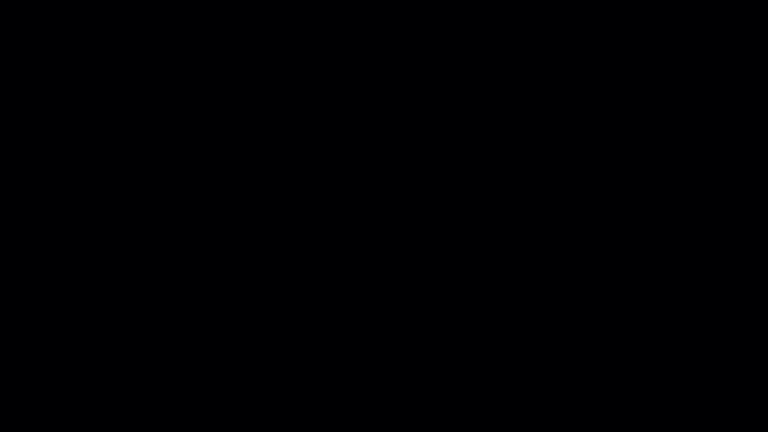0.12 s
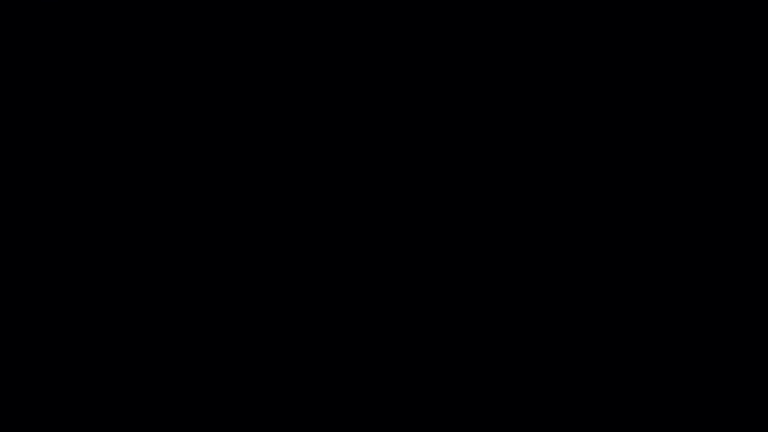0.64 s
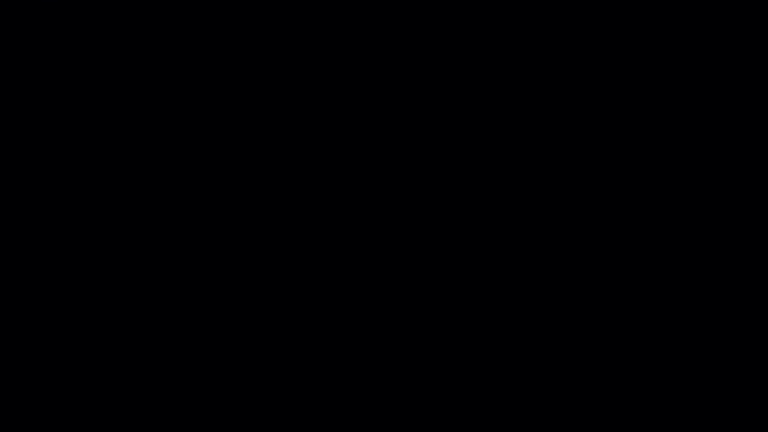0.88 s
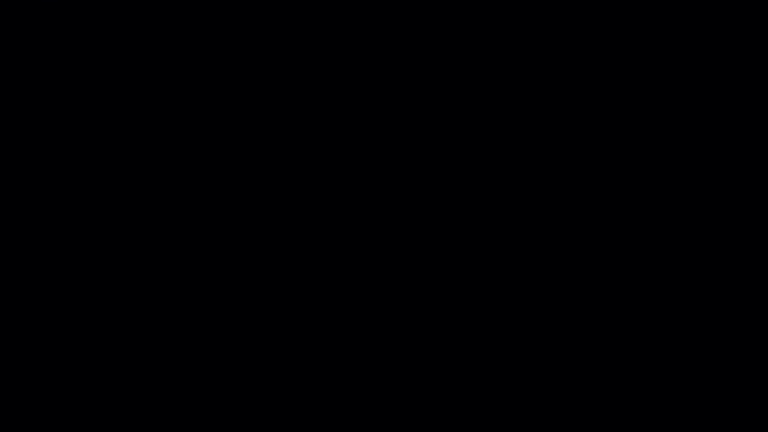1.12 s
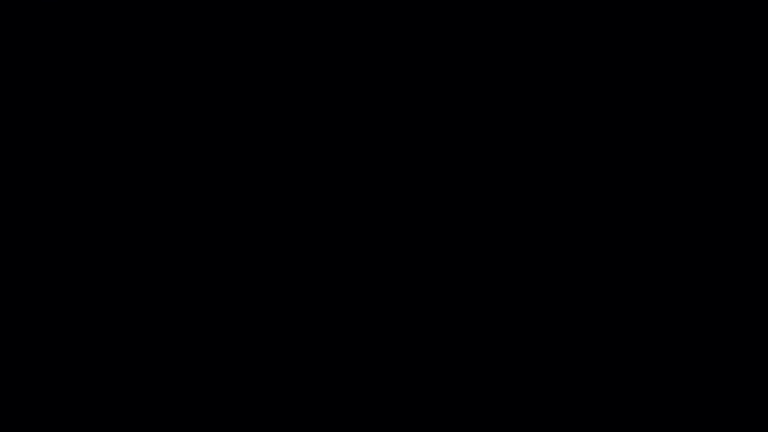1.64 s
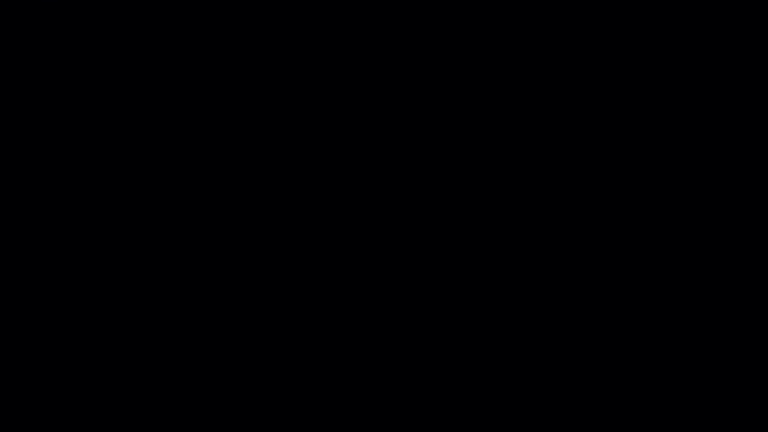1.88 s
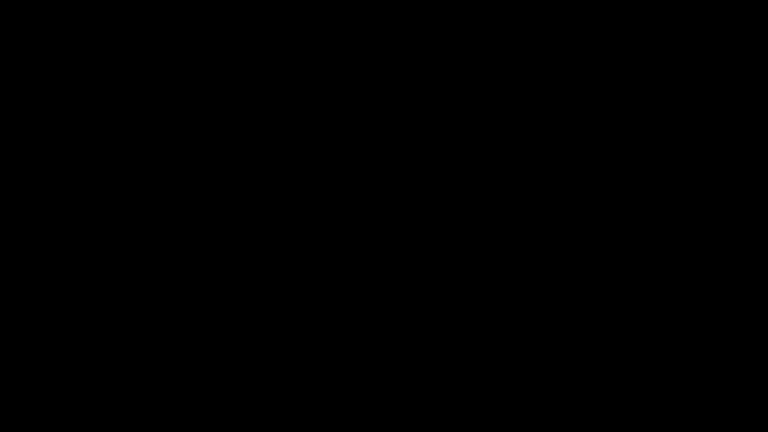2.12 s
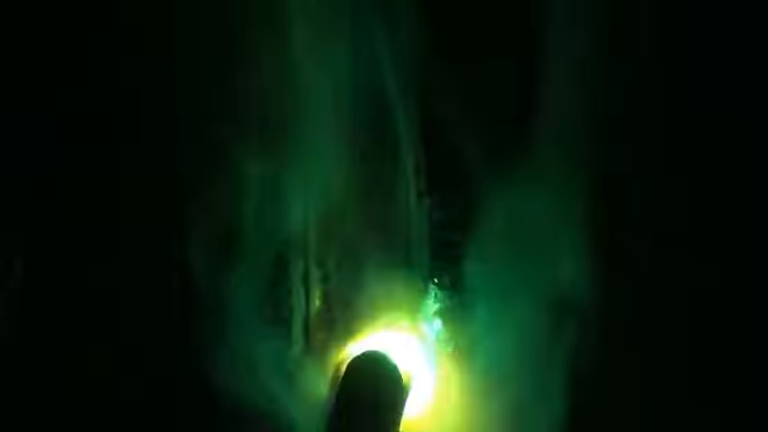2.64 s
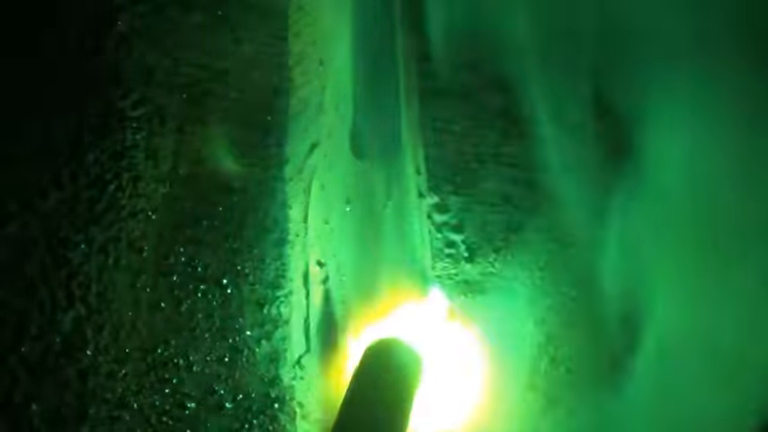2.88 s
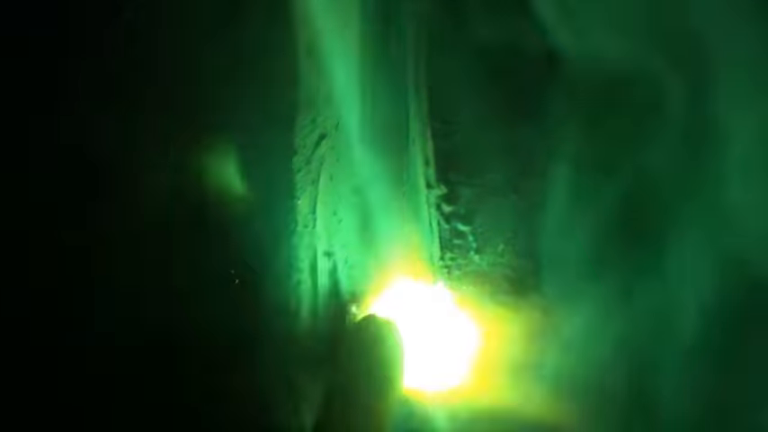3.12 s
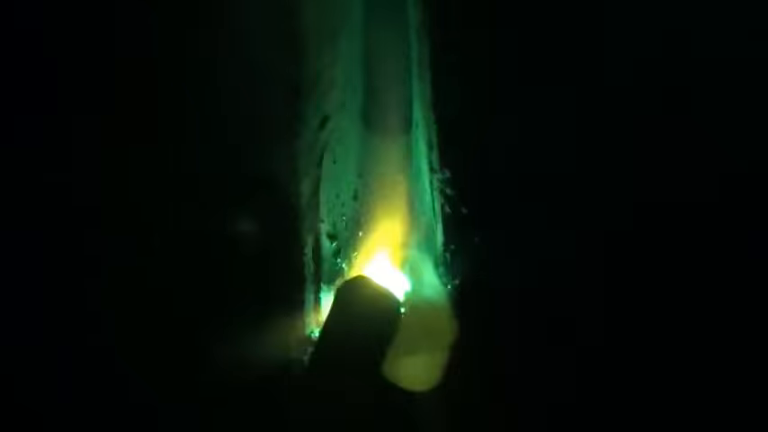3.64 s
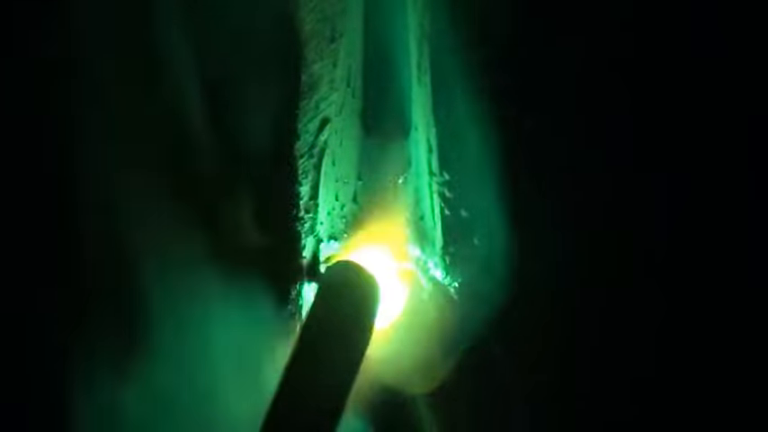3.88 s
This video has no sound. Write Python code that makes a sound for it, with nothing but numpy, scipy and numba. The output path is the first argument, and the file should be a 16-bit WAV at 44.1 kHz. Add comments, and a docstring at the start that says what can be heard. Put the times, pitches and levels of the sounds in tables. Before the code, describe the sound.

Stick welding arc bursts into roaring sizzle and pops after a humming fan, taps and sparks

```python
"""A five-blade fan hums in a stick welder's machine: sines on the orders of its shaft, over rushing air.
The rod taps, scratches and sparks on steel: decaying modes and short bursts of coloured noise.
A brief flash dies away; later the arc strikes, a roar and sizzle of tiny discharges with droplet pops
and the inverter's whine. The recorder's look-ahead limiter ducks everything under each loud spark."""
import sys
import numpy as np
from scipy import signal
from scipy.fft import rfft, irfft, next_fast_len
from scipy.io import wavfile
from scipy.ndimage import uniform_filter1d, minimum_filter1d, map_coordinates
from numba import njit

SR = 44100
rng = np.random.default_rng(int(sys.argv[2]) if len(sys.argv) > 2 else 0)


def digitize_waveform(pressure):
    """Quantize a signal to 16-bit integers and store it at the path in sys.argv[1].

    Rows of a 2-D input are taken as channels; values are limited to [-1, 1].
    """
    field = np.atleast_2d(pressure).T
    bounded = np.clip(field, -1, 1)
    quanta = np.round(bounded * 32767).astype(np.int16)
    wavfile.write(sys.argv[1], SR, quanta)


def elevation(decibels):
    """Turn decibel levels (scalar or array-like) into linear amplitude ratios."""
    levels = np.asarray(decibels, float)
    return 10 ** (levels / 20)


N = 176400

# Likeness of the two channels asked of arc and sparks.
# Each row: frequency in Hz, squared left-right correlation from 0 to 1.
ARC_COHERENCE = [(600, 0.63), (1410, 0.63), (2400, 0.98), (4500, 0.4), (6820, 0.81), (9500, 0.73),
                 (12000, 1)]
# Stereo balance of arc and sparks. Each row: frequency in Hz, left over right in dB.
ARC_BALANCE = [(700, -4), (2400, 1.5), (6800, 0.5), (15000, -1)]


def unit(x):
    """Normalisation by the root mean square: the result has rms 1."""
    return x / np.sqrt(np.mean(x ** 2) + 1e-20)


def along(points, hz):
    """Interpolation of (Hz, value) points on a logarithmic frequency axis."""
    point_hz, values = np.transpose(points)
    return np.interp(np.log(hz + 1), np.log(point_hz + 1), values)


def curves(rows):
    """Piecewise-linear envelopes: one value per sample for each column after the time."""
    seconds, *columns = np.transpose(rows)
    return [np.interp(np.arange(N) / SR, seconds, column) for column in columns]


def wobble(rate):
    """Band-limited random modulation: a smooth curve through `rate` random knots a second."""
    knots = rng.standard_normal(int(N * rate / SR) + 4)
    return map_coordinates(knots, [np.arange(N) * rate / SR])


def coloured(pair, spectrum, coherence, balance, peaks=()):
    """Minimum-phase filtering of a mid and a side signal, mixed to stereo by coherence and balance."""
    m = next_fast_len(N + 8192)
    hz = np.fft.rfftfreq(m, 1 / SR)
    floored_db = np.maximum(along(spectrum, hz), -70)
    peaks_db = sum(up / (1 + (2 * (hz - f) / width) ** 2) for f, width, up in peaks)
    # folding the cepstrum onto positive times makes the filter causal
    cepstrum = irfft(np.log(elevation(floored_db + peaks_db)), m)
    cepstrum[1:m // 2] *= 2
    cepstrum[m // 2 + 1:] = 0
    response = np.exp(rfft(cepstrum))
    angle = np.arccos(np.sqrt(np.clip(along(coherence, hz), 0, 1))) / 2
    mid, side = rfft(pair, m) * response * [np.cos(angle), np.sin(angle)]
    lean = elevation(along(balance, hz) / 2)
    return irfft([(mid + side) * lean, (mid - side) / lean], m)[:, :N]


def discharge(spectrum, per_s, spread_db, crackle, flutter_db):
    """Shot noise: random micro-discharges of uneven size mixed with plasma hiss, at rms 1."""
    # Resonances of the room, helmet and microphone housing.
    # Each row: frequency in Hz, width in Hz at half the dB height, height in dB.
    resonances = [(2260, 130, 5.5), (2687, 32, 11), (2947, 210, 5.5), (3320, 60, -1.5), (3570, 29, 9.5),
                  (6660, 38, 9), (7080, 65, 7.5), (7900, 50, 7.5), (8200, 71, 3), (8500, 100, 8)]
    struck = rng.random(N) < per_s / SR
    sign = np.sign(rng.standard_normal(N))
    clicks = struck * sign * elevation(spread_db * rng.random(N))
    share = np.clip(crackle, 0, 1)
    hiss = rng.standard_normal((2, N))
    pair = np.sqrt(1 - share) * hiss + np.sqrt(share) * np.array([unit(clicks), hiss[1]])
    flutter = elevation(flutter_db * (0.37 * wobble(25.02) + wobble(110)))
    return unit(flutter * coloured(pair, spectrum, ARC_COHERENCE, ARC_BALANCE, resonances))


def arc():
    """Plasma noise in two bands and an inverter ripple tone, each under its own envelope, after a flash."""
    # The burning arc. Each row: time in seconds, roar level in dB, sizzle level in dB.
    arc_levels = [(2.266, -56, -60), (2.272, -22, -14), (2.3, -24.5, -15), (2.34, -15, -12),
                  (2.4, -13, -18.5), (2.43, -12, -14), (2.52, -14.5, -11), (2.57, -18, -17),
                  (2.66, -17.5, -14), (2.74, -16, -16), (2.77, -24, -24), (2.8, -23.5, -20.5),
                  (2.86, -20, -23), (2.99, -14.5, -18), (3.1, -21.5, -22.5), (3.15, -15.5, -18.5),
                  (3.22, -16, -17.5), (3.28, -18.5, -13.5), (3.35, -19, -17), (3.46, -20, -15),
                  (3.53, -20.5, -14), (3.6, -16.5, -14.5), (3.68, -21.5, -17.5), (3.73, -25.5, -14.5),
                  (3.78, -20.5, -12), (3.81, -22, -15.5), (3.9, -22, -16), (4, -21, -18.5)]
    # Spectrum of the roar. Each row: frequency in Hz, relative power density in dB.
    roar_spectrum = [(350, -35.5), (600, -27.5), (846, -4.5), (1020, -19.5), (1050, -7), (1140, -7),
                     (2180, -2), (2550, -6), (3020, -1.5), (3720, 0.5), (4260, -13), (5200, -13.5),
                     (6760, -62), (11400, -120)]
    # Spectrum of the sizzle. Each row: frequency in Hz, relative power density in dB.
    sizzle_spectrum = [(2350, -50.5), (4000, -2.5), (4280, -10.5), (5150, -10), (5700, -4), (7500, -3),
                       (8300, 0.5), (8700, -4.5), (9180, -7), (12000, -10), (12900, -5.5), (13800, -16),
                       (14900, -13), (15400, -5)]
    # The inverter's ripple, heard through the arc. Each row: time in seconds, mean rms level in dB.
    whine_levels = [(2.295, -60), (2.315, -27), (2.39, -15), (2.45, -27), (2.53, -30), (2.62, -17.5),
                    (2.75, -18), (2.772, -50), (2.79, -16), (2.9, -26), (2.99, -15), (3.09, -24),
                    (3.145, -30), (3.23, -21), (3.27, -26), (3.32, -17), (3.4, -26), (3.46, -26),
                    (3.55, -27), (3.6, -20), (3.68, -28), (3.72, -16), (3.765, -25), (3.785, -0.5),
                    (3.81, -15), (3.9, -19), (4, -18.5)]
    # The first flash of arc, which dies. One row: start in seconds, starting level in dB, T60 in seconds.
    first_flash = (.4825, -15, .38)
    # Spectrum of the flash. Each row: frequency in Hz, relative power density in dB.
    flash_spectrum = [(590, -66), (1000, -32), (1150, 4), (1280, -20), (1590, -17), (3080, -4),
                      (4680, -13.5), (7880, -2), (9490, -6), (15100, -11.5), (16000, -30)]
    whine_hz = 15691

    t = np.arange(N) / SR
    start_s, flash_db, t60 = first_flash
    flash_gain = (t > start_s) * elevation(flash_db - 60 * np.abs(t - start_s) / t60)
    flash = flash_gain * discharge(flash_spectrum, per_s=450, spread_db=11, crackle=.15, flutter_db=-3.5)

    roar_db, sizzle_db = curves(arc_levels)
    roar = elevation(roar_db) * discharge(roar_spectrum, per_s=400, spread_db=11.5, crackle=0.5, flutter_db=1.25)
    sizzle = elevation(sizzle_db) * discharge(sizzle_spectrum, per_s=1800, spread_db=12.5, crackle=0.53,
                                        flutter_db=0.35)

    whine_gain = np.sqrt(2) * elevation(curves(whine_levels)[0] + 1.4 * wobble(30))
    whine = whine_gain * np.sin(2 * np.pi * whine_hz * t + 0.54 * wobble(40))
    burning = t > arc_levels[0][0]
    return flash + burning * (roar + sizzle + whine)


def sparks():
    """Impulse excitation: a sharp crack and brief fizz per spark or pop, gritty noise per drag of the rod."""
    # Sparks as the rod scratches. Each row: time in seconds, relative level in dB.
    scratch_sparks = [(0.0224, -29), (0.0452, -19), (0.0819, -30), (0.756, -30), (1.3004, -15),
                      (1.3853, -10), (1.5979, -7), (1.6028, -13), (1.6074, -14), (1.6142, -20),
                      (1.7762, -25), (1.8222, -28), (1.9133, -26), (1.922, -29), (1.9275, -14),
                      (1.9361, -2), (1.9434, -17), (1.9479, -21), (1.9534, -12), (1.9876, -14),
                      (1.9929, -22), (2.0066, -17), (2.0135, -12), (2.0197, -24), (2.0301, -20),
                      (2.0438, -27), (2.0907, -27), (2.0965, -29), (2.1068, -19), (2.1135, -26),
                      (2.1249, -20), (2.1764, -28), (2.1846, -11), (2.1961, -25), (2.2031, -27),
                      (2.2298, -28), (2.2411, -15), (2.2512, -29), (2.2694, -6), (2.2768, -6),
                      (2.2827, -10), (2.2924, -1), (1.5945, -10), (.4832, -3), (.4905, -9), (.9706, -17)]
    # Droplets short the arc and pop. Each row: time in seconds, relative level in dB.
    droplet_pops = [(2.4374, -7), (2.5016, -6), (2.5864, -8), (2.6977, -9), (2.775, -3.5), (2.942, -8.5),
                    (3.0066, -12), (3.1914, -3), (3.2177, -6), (3.2417, -8), (3.3112, 5), (3.4426, -2),
                    (3.4979, -0.5), (3.5564, 7), (3.6903, 19.5), (3.7722, 1), (3.789, -4), (3.8494, -8)]
    # The rod drags. Each row: start in seconds, length in seconds, relative level in dB.
    scrapes = [(1.589, 0.033, -30), (1.92, 0.051, -25), (1.986, 0.043, -23.5), (2.088, 0.04, -29.5),
               (2.159, 0.14, -37)]
    # Colour of crack, fizz and scrape. Each row: frequency in Hz, relative level in dB.
    spark_spectrum = [(40, -13), (500, 9), (1500, -9), (2910, 1), (5300, -11.5), (6830, -2.5), (9010, 0.5),
                      (11400, -7), (12600, -12.5), (14300, -18.5), (16000, -9)]
    fizz_t60_s, fizz_db = .011, -7  # fizz level against its crack
    spark_db, grit_db = 3, 4.5  # added to all sparks and pops; unevenness of a scrape

    out = np.zeros((2, N + SR))
    t = np.arange(1500) / SR
    for start_s, db in scratch_sparks + droplet_pops:
        burst = elevation(fizz_db - 60 * t / fizz_t60_s) * rng.standard_normal((2, len(t)))
        burst[0, 0] = 2  # the crack, in the mid signal
        out[:, round(start_s * SR) - 6:][:, :len(t)] += elevation(db + spark_db) * burst
    for start_s, length_s, db in scrapes:
        n = round(length_s * SR)
        envelope = elevation(db + grit_db * wobble(235)[:n]) * np.hanning(n) ** 0.76
        out[:, round(start_s * SR):][:, :n] += envelope * rng.standard_normal((2, n))
    # white noise through the same colour sets the scale
    noise = coloured(rng.standard_normal((2, N)), spark_spectrum, ARC_COHERENCE, ARC_BALANCE)
    return coloured(out[:, :N], spark_spectrum, ARC_COHERENCE, ARC_BALANCE) / np.std(noise)


def taps():
    """Modal synthesis: rod and plate ring in decaying modes, with filtered noise for knock and rattle."""
    # Touches of rod on plate. Each row: start in seconds, rise time constant in seconds,
    # then relative levels of rod, plate and knock in dB.
    touches = [(.4828, .0005, -40, -45, 1), (.821, .006, -35, -27, -26), (.8715, .002, -42, -38, -30),
               (.9695, .0005, -26, -45, -12), (1.299, .0005, -55, -55, -19), (1.7615, .0005, -55, -55, -15)]
    # Modes of the rod. Each row: frequency in Hz, relative level in dB, T60 in seconds.
    rod_modes = [(696, 5.5, 0.038), (3110, 1, .1), (3440, 5, 0.057), (10400, -3, 0.28), (11600, -4, .06)]
    # Modes of the plate. Each row: frequency in Hz, relative level in dB, T60 in seconds.
    plate_modes = [(2945, -3, .12), (5868, 2, .065), (8172, -8, .07), (14640, -8, .04)]
    out = np.zeros(N + SR)
    t = np.arange(SR // 2) / SR

    def ring(modes):
        """Free vibration: a sum of exponentially decaying sines with slightly unsteady phase."""
        return sum(elevation(db - 60 * t / t60) * np.sin(2 * np.pi * hz * t + .5 * wobble(300)[:len(t)])
                   for hz, db, t60 in modes)

    def noise_burst(band_hz, t60):
        """Damped broadband excitation: band-passed noise decaying exponentially."""
        band_pass = signal.butter(2, band_hz, "band", fs=SR)
        return elevation(-60 * t / t60) * signal.lfilter(*band_pass, rng.standard_normal(len(t)))

    for start_s, rise_s, rod_db, plate_db, knock_db in touches:
        knock = noise_burst([1400, 4200], .06)
        rattle = noise_burst([5000, 15000], .12)
        rod = elevation(rod_db) * ring(rod_modes)
        plate = elevation(plate_db) * (ring(plate_modes) + elevation(5.5) * rattle)
        blow = rod + plate + elevation(knock_db) * knock
        out[round(start_s * SR):][:len(t)] += blow * (1 - np.exp(-t / abs(rise_s)))
    return out[:N] * elevation([[.6], [-.6]])  # left, right in dB


def fan():
    """Rotor noise: harmonics of the shaft rate, slightly unsteady in level, over broadband air noise."""
    # Rate at which blades pass. Each row: time in seconds, frequency in Hz.
    blade_pass = [(0.0, 536.8), (2.88, 540.1), (2.97, 539.4), (4.0, 539.2)]
    # Tones of the fan. Each row: shaft order, mean rms level in dB, left over right in dB,
    # phase lead of the left in radians.
    shaft_tones = [(2, -44.5, -1.5, 0), (3, -42, -6.5, 0.025), (4, -37, 3, -0.4), (5, -21, -7.5, 0.53),
                   (7, -59.5, -5, 0.068), (10, -32.5, -5.5, -0.8), (12, -41.5, 8, -0.24),
                   (15, -44.5, -2.5, 0.2), (20, -44.5, -2, 0), (27, -44.5, 0, 0), (28, -52, 0, 0),
                   (39, -52.5, -5, 0)]
    # Spectrum of the air. Each row: frequency in Hz, relative power density in dB.
    air_spectrum = [(15, -84), (30, -28), (80, -27), (125, -20), (160, -10), (200, -16.5), (300, -10),
                    (400, -16), (600, -18), (936, -20.5), (1400, -18.5), (2100, -25), (2910, -18.5),
                    (4200, -25.5), (5000, -33.5), (7000, -30.5), (8300, -32.5), (9500, -44), (12000, -48),
                    (16000, -60)]
    # Likeness of the air's channels. Each row: frequency in Hz, squared left-right correlation.
    air_coherence = [(60, 0.63), (130, 0.96), (290, 0.76), (640, 0.31), (1410, 0.32), (3100, 0.2),
                     (6820, 0.43), (11000, 1)]
    blades, air_db, air_swell_db = 5, -28.5, .5

    shaft_hz = curves(blade_pass)[0] / blades
    shaft_angle = 2 * np.pi * np.cumsum(shaft_hz) / SR
    side = np.array([[.5], [-.5]])  # left, right
    tones = 0
    for order, db, left_db, lead in shaft_tones:
        gain = np.sqrt(2) * elevation(db + left_db * side + 0.95 * wobble(6.08))
        phase = round(order) * shaft_angle + lead * side + rng.uniform(0, 2 * np.pi)
        tones = tones + gain * np.sin(phase)
    noise = rng.standard_normal((2, N)) * elevation(air_swell_db * wobble(9.2))
    air = coloured(noise, air_spectrum, air_coherence, [(100, 0), (3000, .6)])
    return tones + elevation(air_db) * unit(air)


def shop(x):
    """Reverberation: convolution with noise in which each frequency dies at its own speed."""
    # Decay of the workshop. Each row: frequency in Hz, T60 in seconds.
    decay = [(300, .5), (3000, 0.99), (12000, 0.083)]
    hz, t, z = signal.stft(rng.standard_normal((2, SR // 2)), SR, nperseg=256)
    fade = elevation(-60 * t / along(decay, hz)[:, None])
    tail = signal.istft(z * fade, SR, nperseg=256)[1]
    tail = tail / np.linalg.norm(tail[0])
    return signal.fftconvolve(x.mean(0)[None], tail, axes=1)[:, :N]


def scene():
    """Superposition: the hits get the room, while the steady sources already carry it."""
    shop_db = -16
    hits = sparks() + taps()
    return arc() + hits + fan() + elevation(shop_db) * shop(hits)


@njit
def recover(gain, step):
    """Exponential release: gain falls at once and climbs back smoothly."""
    out = gain.copy()
    for i in range(1, len(out)):
        out[i] = min(gain[i], out[i - 1] + step * (1 - out[i - 1]))
    return out


def limiter(dry):
    """Feed-forward gain control: stereo-linked, looking ahead and listening harder to treble."""
    ceiling_db, treble_weight = -9, 0.27
    look_ahead_s, release_s = .003, .027
    detect_s = .0001  # averaging time of the detector, so the sharpest cracks overshoot
    peak = np.abs(dry + treble_weight * np.diff(dry, prepend=0)).max(0)
    peak = np.abs(uniform_filter1d(peak, round(detect_s * SR)))
    ahead = round(look_ahead_s * SR)
    need = minimum_filter1d(np.minimum(1, elevation(ceiling_db) / (peak + 1e-9)), 2 * ahead + 1)
    gain = uniform_filter1d(recover(need, 1 / (release_s * SR)), ahead)
    return dry * gain


def top_cut(x):
    """Nothing passes above the cut-off."""
    return signal.sosfilt(signal.butter(12, 17150, fs=SR, output="sos"), x)


def record(dry):
    """Dynamic limiting, then a band limit by zeroing the spectrum above its top frequency."""
    top_hz = 15790
    m = next_fast_len(N + 4096)
    passed = np.fft.rfftfreq(m, 1 / SR) < top_hz
    kept = irfft(rfft(limiter(dry), m) * passed, m)[:, :N]
    return top_cut(kept)


dry = scene()
out = record(dry)
digitize_waveform(out)
```